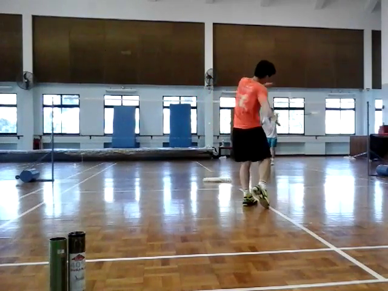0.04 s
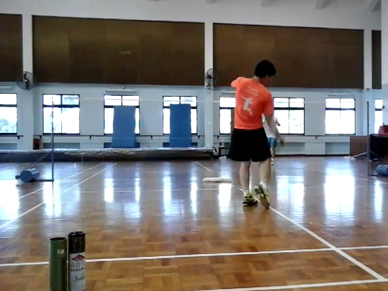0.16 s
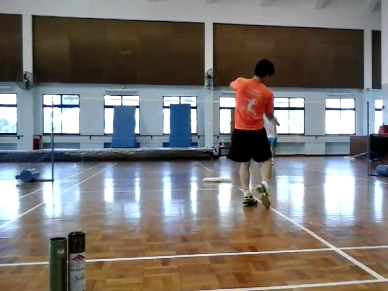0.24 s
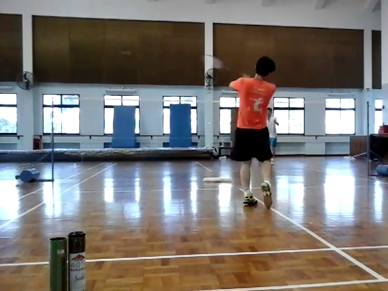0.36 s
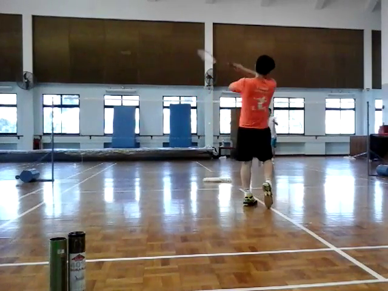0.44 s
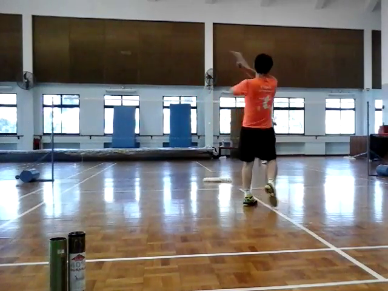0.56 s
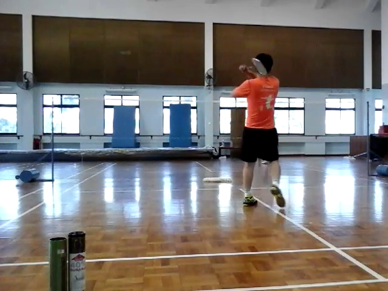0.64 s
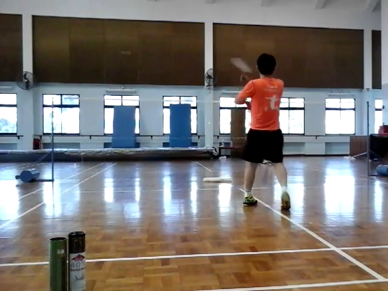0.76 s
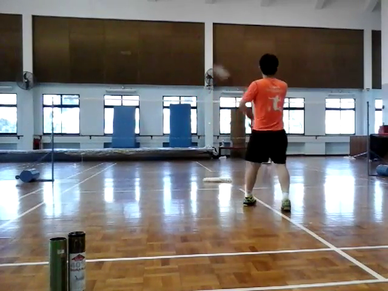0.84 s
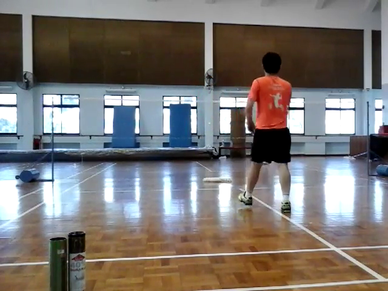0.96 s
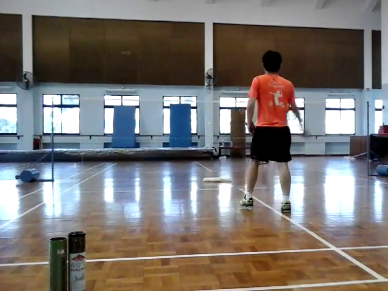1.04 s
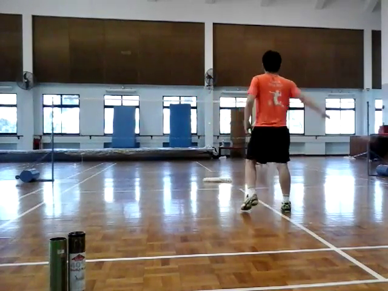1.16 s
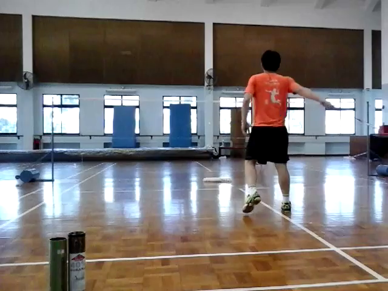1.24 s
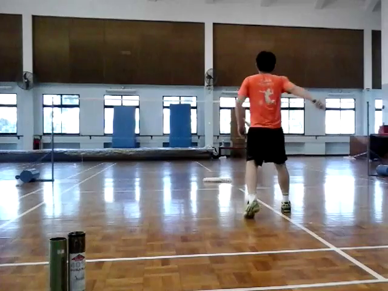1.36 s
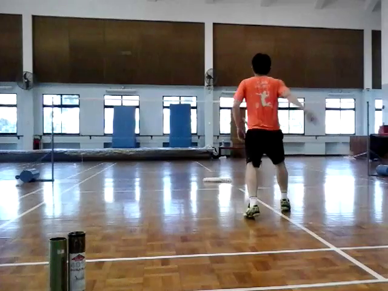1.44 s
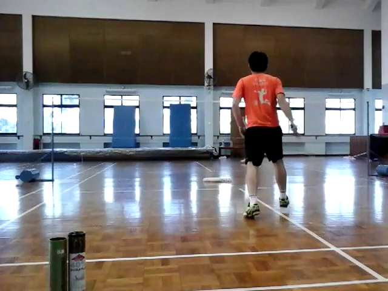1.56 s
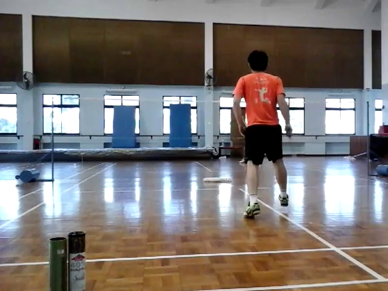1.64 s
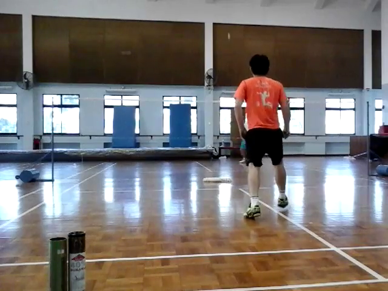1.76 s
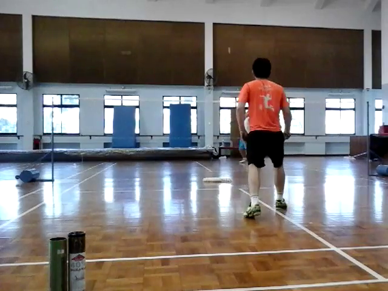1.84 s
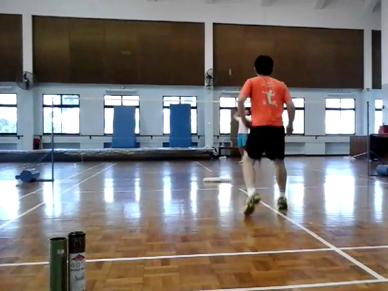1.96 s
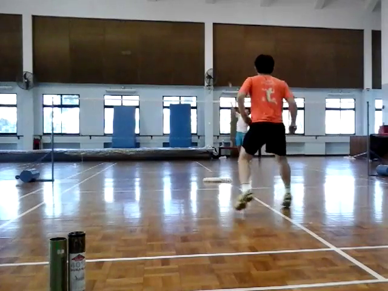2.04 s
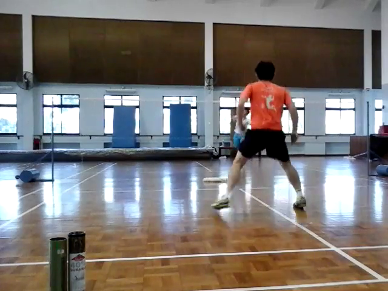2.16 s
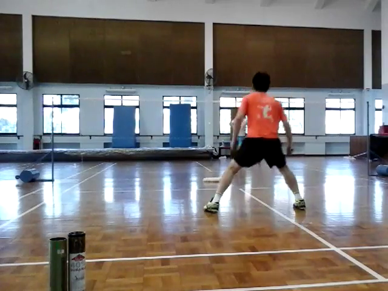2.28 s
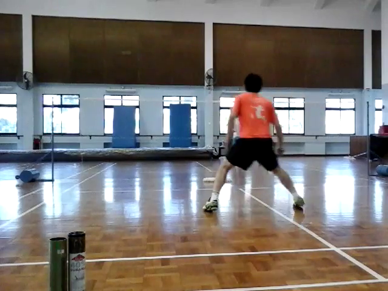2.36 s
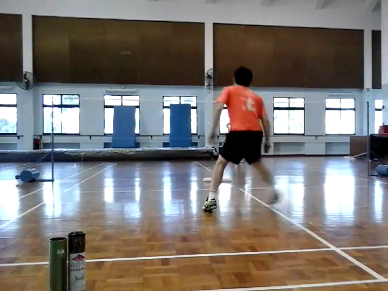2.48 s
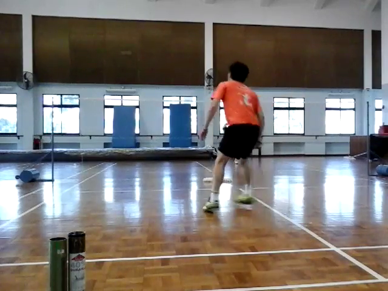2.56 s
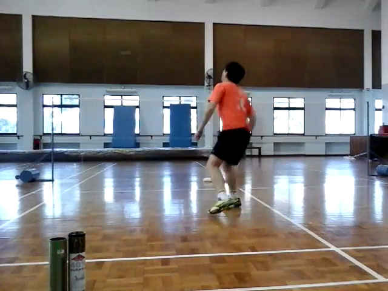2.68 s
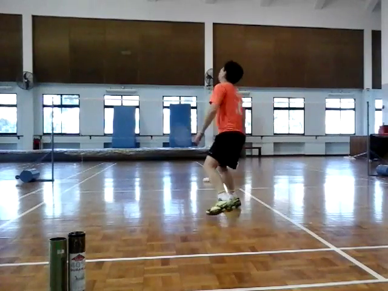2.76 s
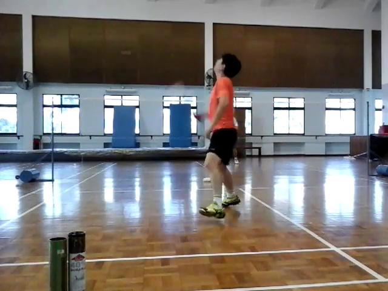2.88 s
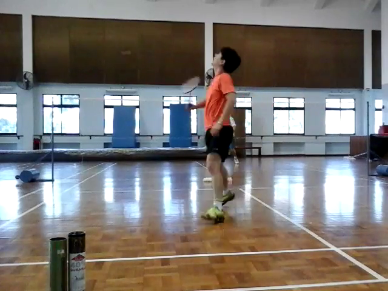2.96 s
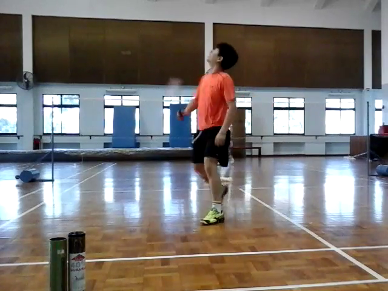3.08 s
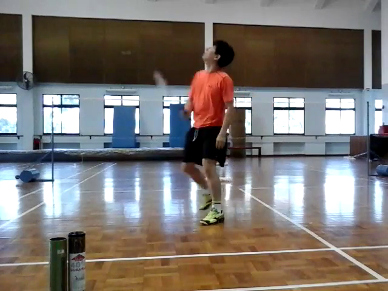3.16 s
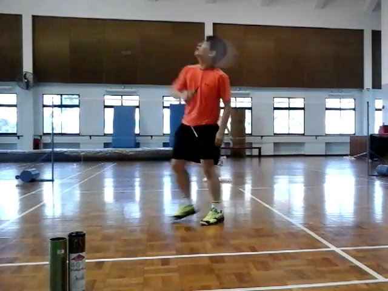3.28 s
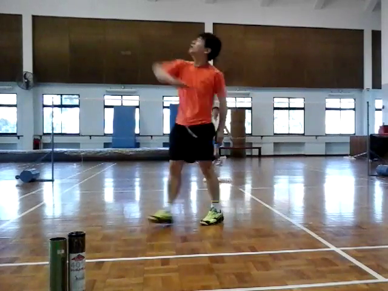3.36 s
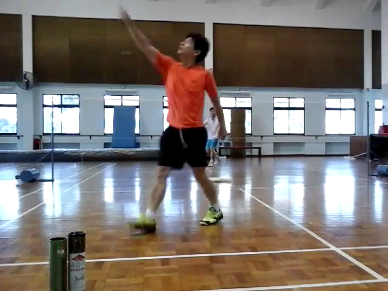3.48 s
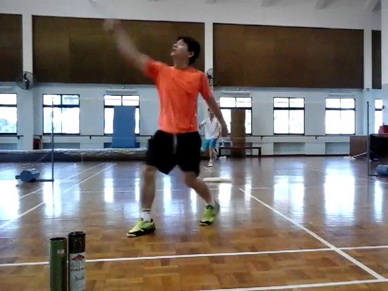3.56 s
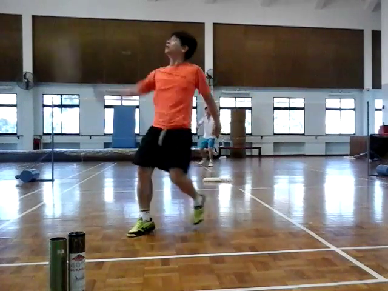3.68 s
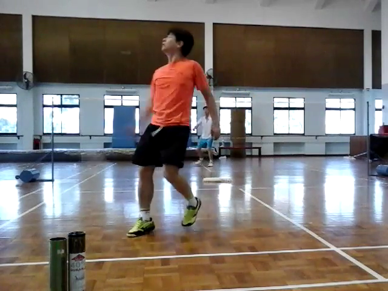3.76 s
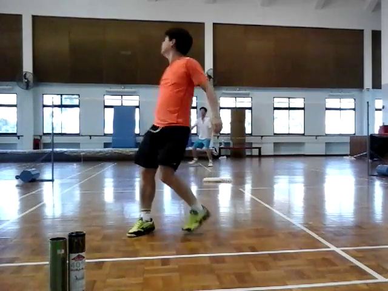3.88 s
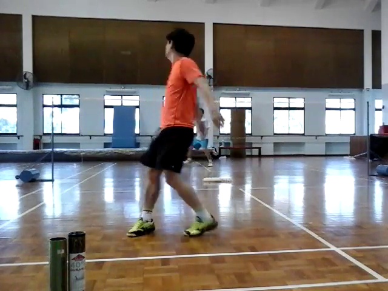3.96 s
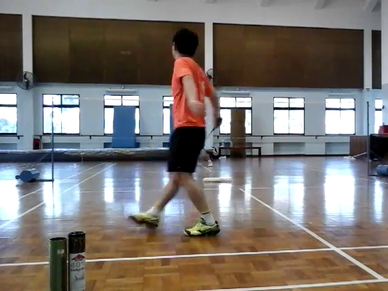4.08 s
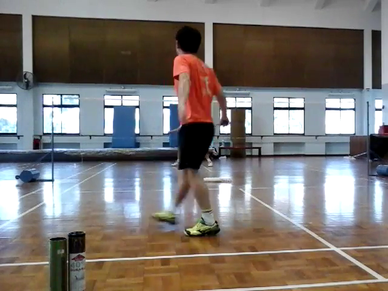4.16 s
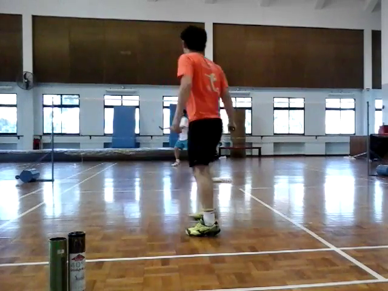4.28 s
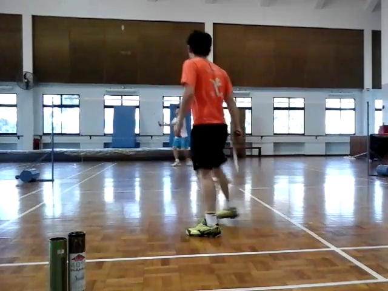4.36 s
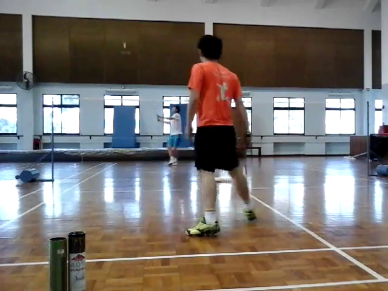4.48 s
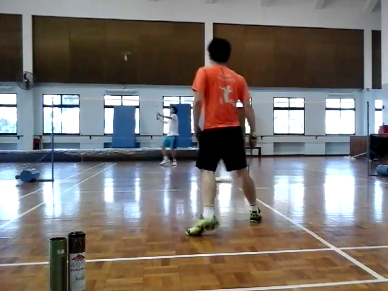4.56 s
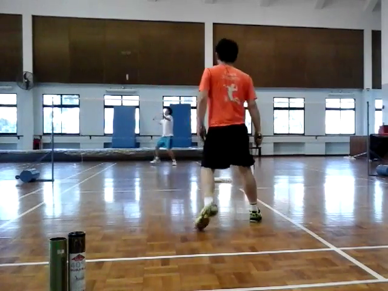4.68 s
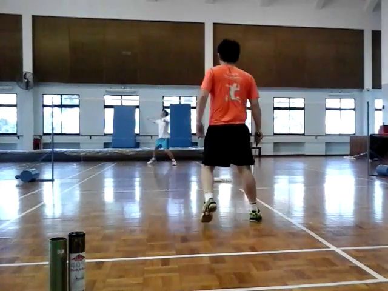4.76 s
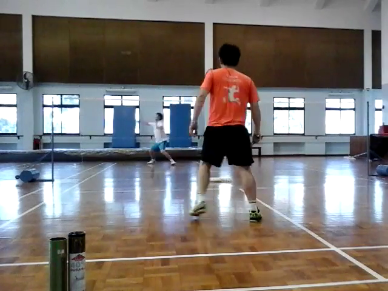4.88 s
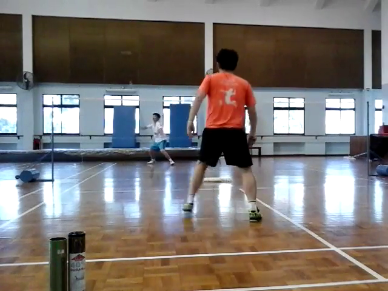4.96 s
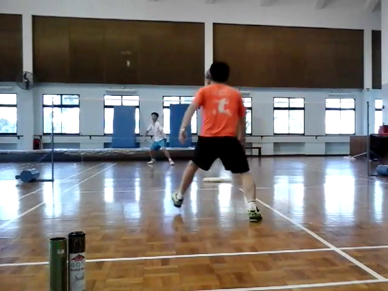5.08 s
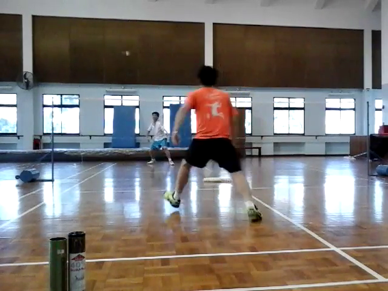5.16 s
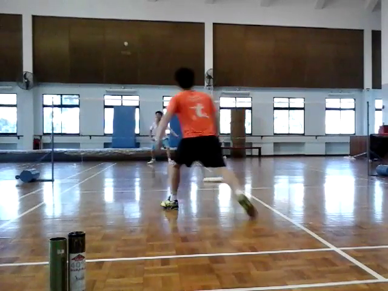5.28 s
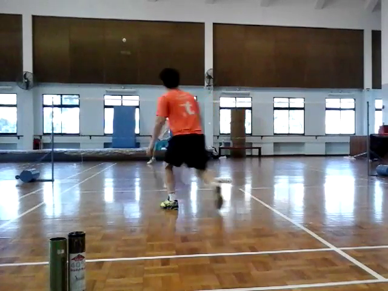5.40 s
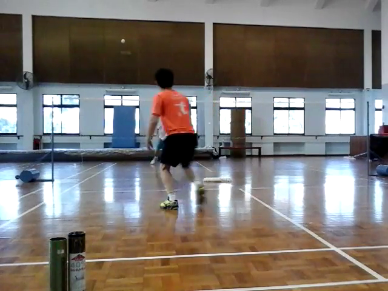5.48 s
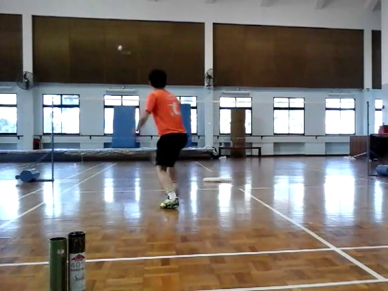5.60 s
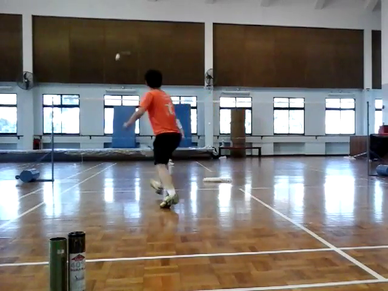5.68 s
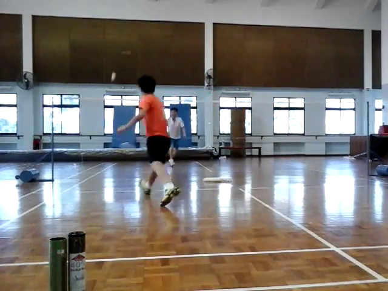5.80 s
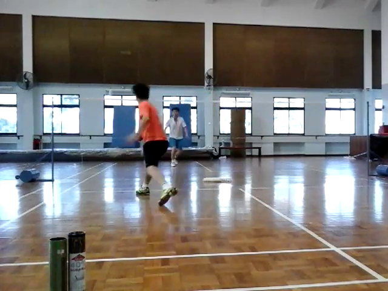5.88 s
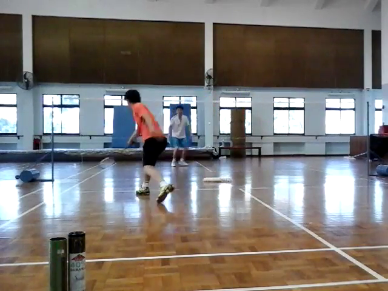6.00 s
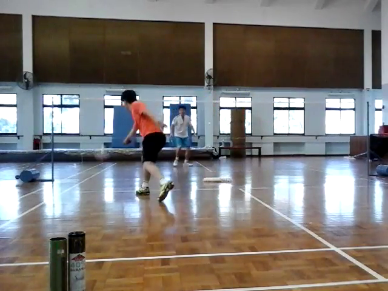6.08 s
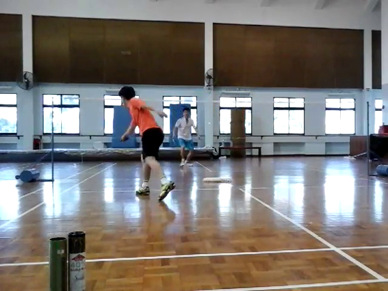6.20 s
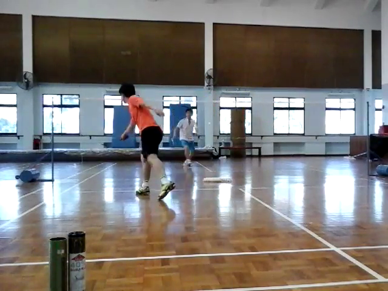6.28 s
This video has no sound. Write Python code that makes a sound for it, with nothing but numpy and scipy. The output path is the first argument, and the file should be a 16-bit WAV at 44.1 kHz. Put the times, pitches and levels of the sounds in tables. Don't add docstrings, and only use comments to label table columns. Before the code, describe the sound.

Badminton rackets crack against a shuttlecock in a large echoing sports hall, with shoe scuffs, squeaks and footfalls over a steady low fan hum.

```python
import sys
import numpy as np
from scipy import signal
from scipy.fft import rfft, irfft, next_fast_len
from scipy.io import wavfile
from scipy.ndimage import uniform_filter1d, map_coordinates

SR = 44100
rng = np.random.default_rng(int(sys.argv[2]) if len(sys.argv) > 2 else 0)


def nominal_scale(level):
    x = np.asarray(level, float) / 20
    return 10 ** x


def pcm_store(signal):
    levels = np.round(np.clip(np.atleast_2d(signal), -1, 1) * 32767)
    wavfile.write(sys.argv[1], SR, levels.astype(np.int16).T)


N = 279373

# (time [s], court end, crack level [dB], hall level [dB], string pitch [Hz])
STROKES = [
    (0.3588, "near", -3, -24.5, 1149),
    (2.1859, "far", -6, -20, 1819),
    (3.6034, "near", -1.5, -20.5, 1304),
    (4.2926, "far", -18, -33.5, 1704),
    (4.9953, "far", -17, -36, 1074),
]
# (thump below strings [dB], cork knock [dB], brightness [dB/octave], string note re crack [dB])
CONTACTS = [
    (-2.5, 1.5, 0, -19),
    (14, -2, 0.2071, -17),
    (4, -6, 0.0764, -19.5),
    (2, 2, -3.5, -11),
    (2, 4.5, 0, -12),
]
# (floor [ms], side wall [ms], roof [ms], far side wall [ms]), trailing ones may be absent
ECHO_PATHS_MS = [
    (9.3, 30.8),
    (8.5, 32.5, 41.5, 27),
    (8.3, 28.5, 42.3, 53),
    (8.5, 30, 44.5),
    (8, 26.5, 37.5),
]
COURT_ENDS = {"near": ((0.0095, 4.25, -4.25), (-1.5, -6, 2, 1)), "far": ((0.0165, -1.68, -9),
              (-2.5, -3, -3, -1))}
# (frequency [Hz], level [dB])
CRACK_SPECTRUM = [(142, -12), (390, 10), (900, 8), (2000, 6), (4000, 6.5), (7000, 3), (10000, 0),
                  (14200, -6.5)]
# (frequency [Hz], t60 [s])
HALL_T60 = [(150, 0.89), (500, 1.29), (1500, 1.22), (4000, 1.122), (7000, 1.145), (10000, 0.939),
            (14000, 0.48)]
# (time [s], length [s], slip pitch [Hz], level [dB],
# strongest [Hz])
NEAR_SQUEAKS = [
    (.945, 0.0204, 1858, -45, 2000),
    (2.075, 0.02, 1883, -39, 2400),
    (2.112, 0.0097, 3285, -45, 6660),
    (3.073, 0.0125, 5900, -45, 8700),
    (4.055, 0.017, 3648, -41.5, 4260),
    (6.192, 0.00856, 3620, -24, 4770),
    (6.2032, 0.0065, 3455, -25.5, 4950),
    (6.206, 0.0195, 2542, -43, 2000),
    (6.22, 0.01256, 3560, -28, 4820),
]
# (time [s], length [s], slip pitch [Hz], level [dB], strongest [Hz])
FAR_SQUEAKS = [
    (2.433, 0.0306, 2730, -46, 2700),
    (2.808, 0.0416, 1986, -49.5, 6330),
    (3.097, 0.0118, 5725, -45, 4850),
    (4.097, 0.0155, 2973, -49, 3000),
]
# (time [s], length [s], level [dB], low edge [Hz])
SCUFFS = [(0.323, 0.054, -46, 5000), (.946, 0.054, -42, 1800), (1.255, 0.214, -54, 3460),
          (1.456, 0.089, -47, 2990), (1.536, 0.0135, -42.5, 3980), (1.909, 0.0554, -47, 4510),
          (2.01, 0.0453, -33.5, 1800), (2.085, 0.053, -44, 2500), (2.113, 0.023, -38, 2500),
          (2.731, 0.0374, -37.5, 1490), (2.788, 0.05, -39, 3800), (2.819, 0.384, -46, 3500),
          (4.062, 0.0377, -35.5, 1510), (4.531, 0.0836, -44.5, 2980), (4.65, 0.076, -45, 1800),
          (4.889, 0.055, -41, 291), (4.908, 0.082, -42, 3500), (5.258, 0.031, -43.5, 3500),
          (5.283, 0.029, -34.5, 2990), (5.313, 0.078, -36.5, 4500), (5.804, 0.0498, -45, 3500),
          (5.949, 0.0422, -35.5, 1800)]
# (time [s], peak [dB], pitch [Hz])
GRIT_TICKS = [(.951, -25, 7460), (2.013, -19.5, 7470), (2.017, -32, 7000), (2.0207, -17, 3470),
              (2.0253, -10.5, 2800), (2.036, -29, 3170), (2.718, -31, 11000), (2.7345, -25, 6500),
              (2.7438, -7.5, 918), (2.7932, -20, 5470), (4.025, -15, 1551), (4.064, -31, 7000),
              (4.072, -14, 2217), (4.376, -27, 7000), (4.6569, -28.5, 6940), (4.671, -20, 3000),
              (5.263, -21, 5000), (5.286, -33, 7000), (5.324, -16, 2800), (5.329, -17.5, 6470),
              (5.343, -15.5, 2510), (5.3617, -18.5, 6500), (5.373, -30, 7000), (5.38, -20, 4600),
              (5.799, -21, 2480), (5.8161, -27.5, 7000), (5.8233, -28.5, 7000), (5.907, -29, 3500),
              (5.956, -18.5, 5000)]
# (time [s], peak [dB])
FOOTFALLS = [(0.541, -29), (0.955, -37), (1.397, -39.5), (2.078, -35), (2.691, -29), (2.738, -36),
             (2.882, -37.5), (3.565, -31.5), (4.285, -29), (4.529, -51.5), (4.599, -33), (4.888, -37),
             (5.386, -36.5), (5.72, -38.5), (5.909, -27), (6.033, -35.5), (6.2, -32), (6.279, -39)]
# (frequency [Hz], density [dB/Hz])
FAN_SPECTRUM = [(25, -14), (60, -8), (100, 0.5), (200, -5.5), (400, -11.5), (800, -18), (1600, -25),
                (3000, -31.5), (6000, -37), (10000, -47), (14000, -50.5)]
# (centre [Hz], width [Hz], level [dB])
DUCT_HUMS = [(92.6, 11.5, -59), (142.29, 13.9, -42)]


def rackets():
    out = np.zeros(N)
    for stroke, contact, paths_ms in zip(STROKES, CONTACTS, ECHO_PATHS_MS):
        s, end, crack_db, hall_db, string_hz = stroke
        thump_db, cork_db, tilt_db, string_db = contact
        (rise_s, swell_db, twin_db), losses_db = COURT_ENDS[end]
        sound = nominal_scale(hall_db) * tail(rise_s, swell_db)
        crack = 2.77 * snap(0.0128)
        for delay_ms, loss_db in arrivals(paths_ms, losses_db, twin_db):
            delay_s = delay_ms / 1000
            low_hz, width_hz = 40000 * delay_s + 20, 400 / (delay_s + 0.0079)
            copy = filtered(crack, lambda hz: above(hz, low_hz) * peak(hz, 3960, width_hz))
            add(sound, delay_s + .002, nominal_scale(crack_db + loss_db) * copy)
        spectrum = contact_spectrum(thump_db, cork_db, tilt_db)
        add(out, s - .002, coloured(sound, spectrum))
        t = np.arange(SR // 10) / SR
        note = nominal_scale(crack_db + string_db - 60 * t / .035) * np.sin(2 * np.pi * string_hz * t)
        add(out, s, in_hall(note, 5))
    return out


def arrivals(paths_ms, losses_db, twin_db):
    skip_ms, skip_db, twin_ms = 5.7, -4, 2.6
    single = [(0.0237, 0)] + list(zip(paths_ms, losses_db))
    skips = [(ms + skip_ms, db + skip_db) for ms, db in single[2:4]]
    twins = [(ms + twin_ms, db + twin_db) for ms, db in single]
    return single + skips + twins


def contact_spectrum(thump_db, cork_db, tilt_db):
    hz, level_db = np.transpose(CRACK_SPECTRUM)
    cork_octaves = np.log2(hz / 2000)
    thump = thump_db / (1 + (hz / 246) ** 2)
    cork = cork_db * np.exp(-(cork_octaves / 0.2) ** 2)
    return list(zip(hz, level_db + thump + cork + tilt_db * cork_octaves))


def snap(t60_s):
    t = np.arange(400) / SR
    fade = nominal_scale(-30 * t / t60_s) * (1 - np.exp(-t / .00015))
    spectrum = rfft(rng.standard_normal(len(t)) * fade ** 2)
    x = fade * irfft(spectrum / np.abs(spectrum))
    return x / np.linalg.norm(x)


def swish():
    out, u = np.zeros(N), np.linspace(0, 1, round(.065 * SR))
    air = filtered(rng.standard_normal(len(u)), lambda hz: peak(hz, 5800, 5850) ** 2)
    add(out, 3.535, nominal_scale(-32.5) * np.sin(np.pi * u ** 1.32) ** 1.76 * air)
    return out


def squeaks():
    out = np.zeros(N)
    near_hall_db, far_hall_db = -0.5, 7.5
    rows = [row + (near_hall_db,) for row in NEAR_SQUEAKS] + [row + (far_hall_db,) for row in FAR_SQUEAKS]
    for s, length_s, pitch_hz, db, best_hz, hall_db in rows:
        u = np.linspace(0, 1, max(round(length_s * SR), 32))
        loose = .012 / length_s
        waver = wobble(len(u), 231.3)
        bend = .02 * (waver - waver.mean()) + .08 * (.5 - u)
        phase = 2 * np.pi * np.cumsum(pitch_hz * (1 + loose * bend)) / SR
        tone = np.zeros(len(u))
        for k in range(1, 6):
            if k * pitch_hz < 12500:
                tone += abs(peak(k * pitch_hz, best_hz, 5000)) ** 2 * np.sin(k * phase)
        noise = rng.standard_normal(len(u))
        rasp = filtered(noise, lambda hz: above(hz, 1480) / (1 + (hz / 11500) ** 16))
        grip = nominal_scale(db + 3 * wobble(len(u), 400)) * np.sin(np.pi * u)
        add(out, s, in_hall(grip * (unit(tone) + loose * nominal_scale(-12.5) * unit(rasp)), hall_db))
    return out


def scuffs():
    out = np.zeros(N)
    for s, length_s, db, low_hz in SCUFFS:
        high_hz = min(6500 + 60 / length_s, 4.36 * low_hz)
        u = np.linspace(0, 1, max(round(length_s * SR), 32))
        hiss = rng.standard_normal(len(u)) * nominal_scale(3.5 * wobble(len(u), 430.2))
        band = filtered(hiss, lambda hz: above(hz, low_hz) / (1 + (hz / high_hz) ** 5))
        add(out, s, nominal_scale(db - 3.0) * np.sin(np.pi * u ** 0.42) ** 0.407 * unit(band))
    for s, db, pitch_hz in GRIT_TICKS:
        tick = filtered(snap(.007), lambda hz: peak(hz, pitch_hz, .45 * pitch_hz) ** 2)
        add(out, s, nominal_scale(db + 15) * tick)
    return in_hall(out, -8)[:N]


def steps():
    push, t = np.zeros(N), np.arange(SR // 20) / SR
    for s, db in FOOTFALLS:
        pulse = np.sin(np.pi * np.clip(t / 0.00458, 0, 1))
        add(push, s, nominal_scale(db + 7.5) * pulse * (1 + 0.74 * rng.standard_normal(len(t))))
    boards = filtered(push, lambda hz: peak(hz, 339, 376) + 0.367 * peak(hz, 1010, 710))
    return in_hall(boards, 8.16)[:N]


def fans():
    z = signal.stft(rng.standard_normal(N), nperseg=512)[2]
    patches = uniform_filter1d(rng.standard_normal(z.shape), size=6, axis=0)
    patches = uniform_filter1d(patches, size=16, axis=1)
    air = signal.istft(z * nominal_scale(0.58 * unit(patches)), nperseg=512)[1][:N]
    out = nominal_scale(-38.0) * unit(filtered(air, lambda hz: nominal_scale(along(FAN_SPECTRUM, hz))))
    for centre_hz, width_hz, db in DUCT_HUMS:
        hum = filtered(rng.standard_normal(N), lambda hz: peak(hz, centre_hz, width_hz) ** 2)
        out = out + nominal_scale(db) * unit(hum)
    return out


def tail(rise_s, end_wall_db):
    hz, t, z = signal.stft(rng.standard_normal(2 * SR), SR, nperseg=256)
    hz = hz[:, None]
    end_wall = np.exp(-((t - .12) / .04) ** 2)
    swell_db = end_wall_db * end_wall * (0.416 + 1 / (1 + (hz / 1600) ** 2))
    decay_db = -60 * t / along(HALL_T60, hz)
    x = signal.istft(z * nominal_scale(swell_db + decay_db), SR, nperseg=256)[1][:2 * SR]
    t = np.arange(len(x)) / SR
    lumps_db = 4 * np.exp(-t / 0.0577) * wobble(len(t), 342.4)
    return x * (1 - np.exp(-t / abs(rise_s))) * nominal_scale(lumps_db)


def in_hall(x, wet_db):
    echo = tail(0.00504, 0.48)
    wet = signal.fftconvolve(x, nominal_scale(wet_db) * echo / np.linalg.norm(echo))
    return wet + np.pad(x, (0, len(echo) - 1))


def unit(x):
    return x / np.sqrt(np.mean(x ** 2) + 1e-20)


def along(points, hz):
    f, v = np.transpose(points)
    return np.interp(np.log(hz + 1), np.log(f + 1), v)


def filtered(x, response):
    m = next_fast_len(x.shape[-1] + 8192)
    return irfft(rfft(x, m) * response(np.fft.rfftfreq(m, 1 / SR)), m)[..., :x.shape[-1]]


def peak(hz, centre_hz, width_hz):
    return 1j * hz * width_hz / (centre_hz ** 2 - hz ** 2 + 1j * hz * width_hz)


def above(hz, edge_hz):
    return (1j * hz / (edge_hz + 1j * hz)) ** 2


def coloured(x, points):
    cepstrum = irfft(np.log(nominal_scale(along(points, np.fft.rfftfreq(2048, 1 / SR)))))
    cepstrum[1:1024] *= 2
    cepstrum[1025:] = 0
    return signal.fftconvolve(x, irfft(np.exp(rfft(cepstrum))))[:len(x)]


def wobble(count, knots_per_s):
    knots = rng.standard_normal(count // 8 + 4)
    return map_coordinates(knots, [np.arange(count) * min(knots_per_s / SR, 1 / 8)])


def add(track, s, sound):
    part = track[round(s * SR):][:len(sound)]
    part += sound[:len(part)]


def scene():
    return (rackets() + swish() + squeaks() + scuffs() + steps() + fans())[None]


def gain_control():
    wake_db, wake_s, rest_db = -2, 1, -0.666
    duck_db, duck_s, hold_s, recover_s = -5.5, 0.044, 0.431, 0.783
    loudest_s = max(STROKES, key=lambda stroke: stroke[2])[0]
    times_s = np.cumsum([0, wake_s, loudest_s - wake_s, duck_s, hold_s, recover_s])
    gain_db = np.interp(np.arange(N) / SR, times_s, [wake_db, 0, 0, duck_db, duck_db, 0])
    return nominal_scale(rest_db + gain_db)


def top_cut(x):
    return signal.sosfilt(signal.butter(12, 14900, fs=SR, output="sos"), x)


def record(dry):
    x = filtered(dry, lambda hz: 1 + nominal_scale(11.5) * peak(hz, 7152, 1024))
    x = x + nominal_scale(-52.5) * rng.standard_normal(N)
    x = x * gain_control()
    x = x / (1 + np.abs(x / .93) ** 6) ** (1 / 6)
    x = filtered(x, lambda hz: np.maximum(1 / (1 + (hz / 13950) ** 120), nominal_scale(-27) * (hz < 16200)))
    return top_cut(x)


dry = scene()
out = record(dry)
pcm_store(out)
```